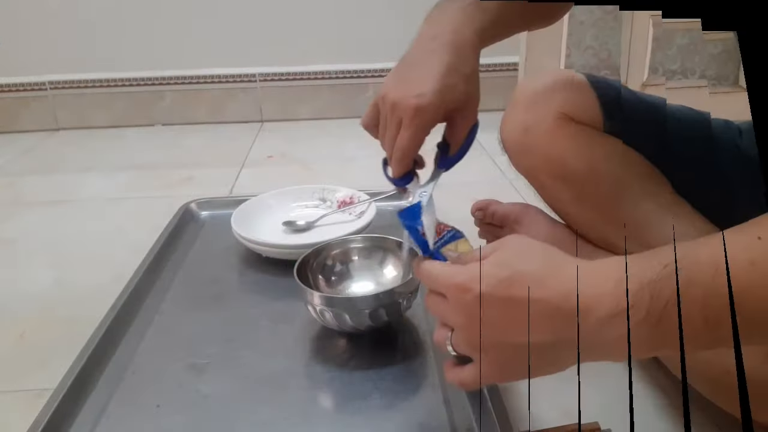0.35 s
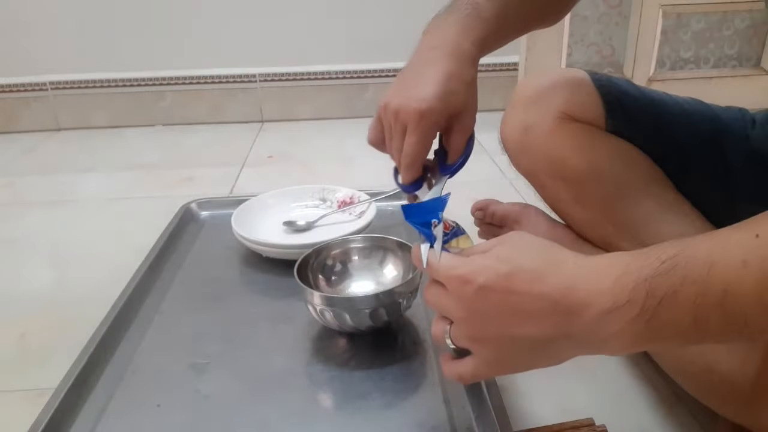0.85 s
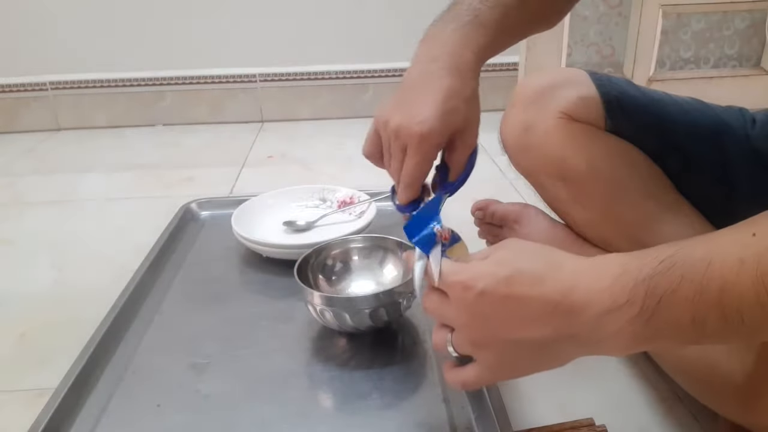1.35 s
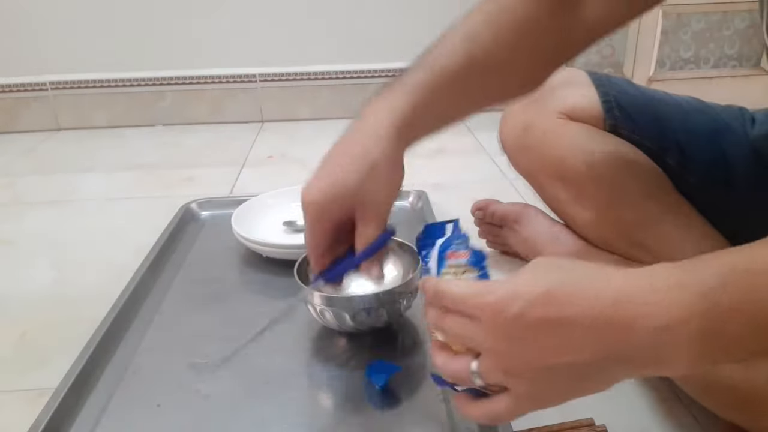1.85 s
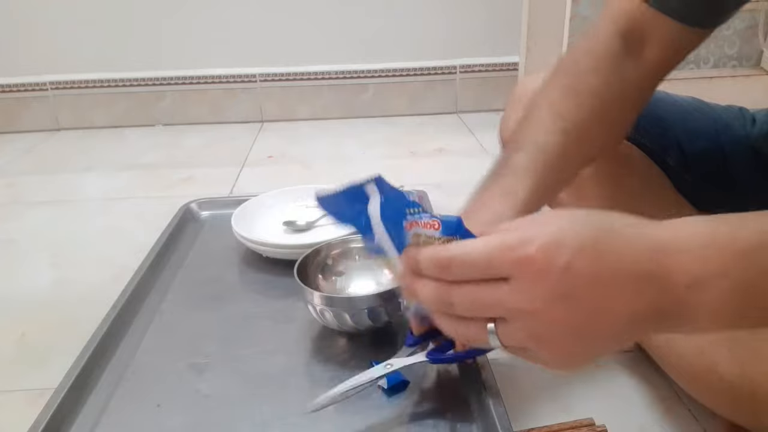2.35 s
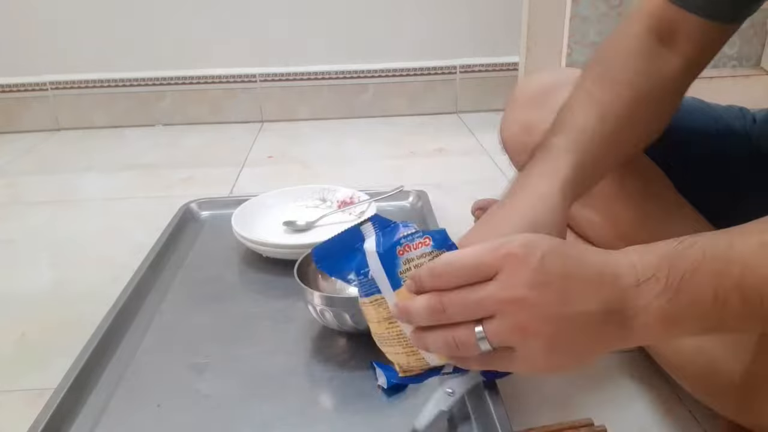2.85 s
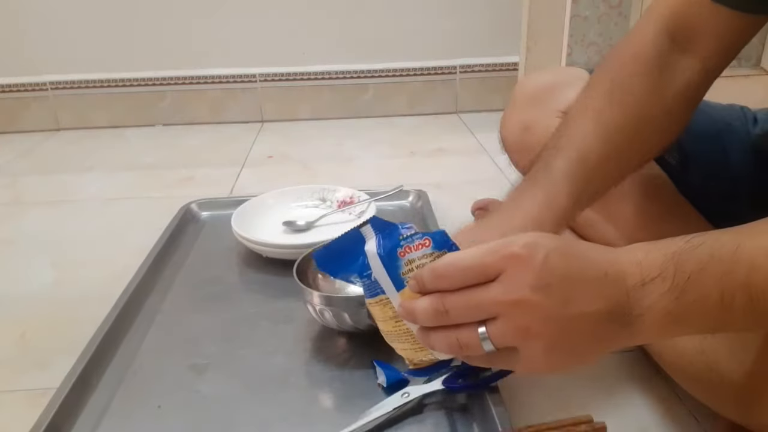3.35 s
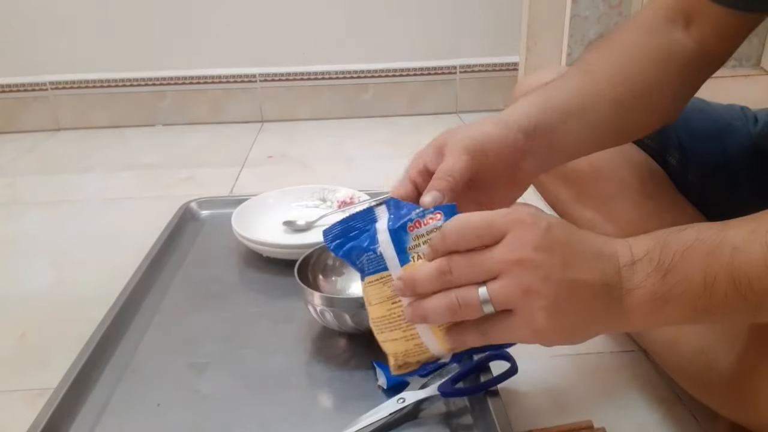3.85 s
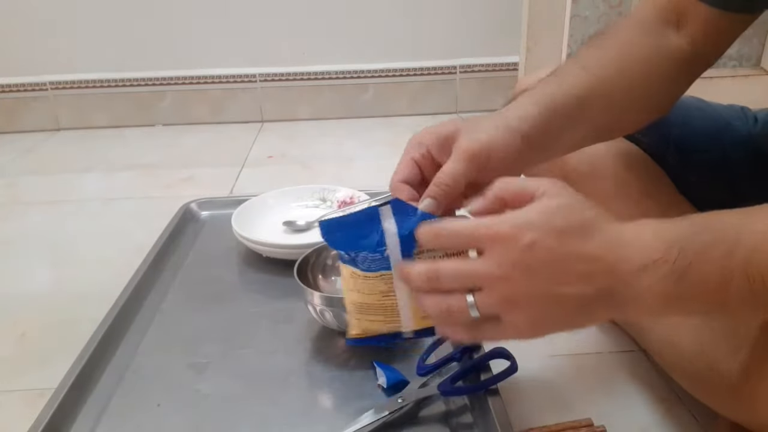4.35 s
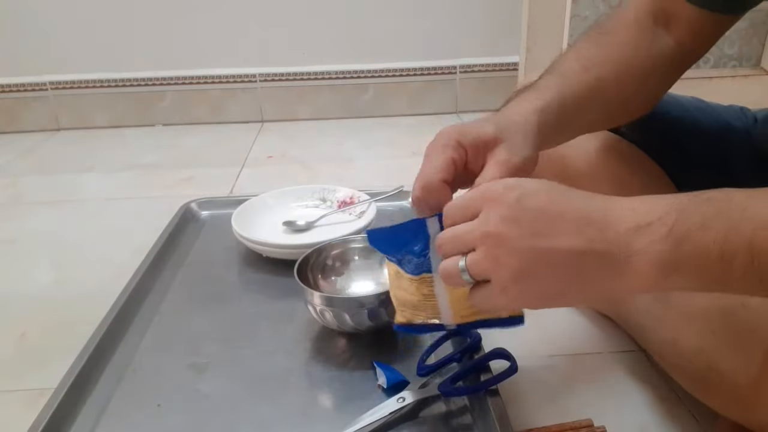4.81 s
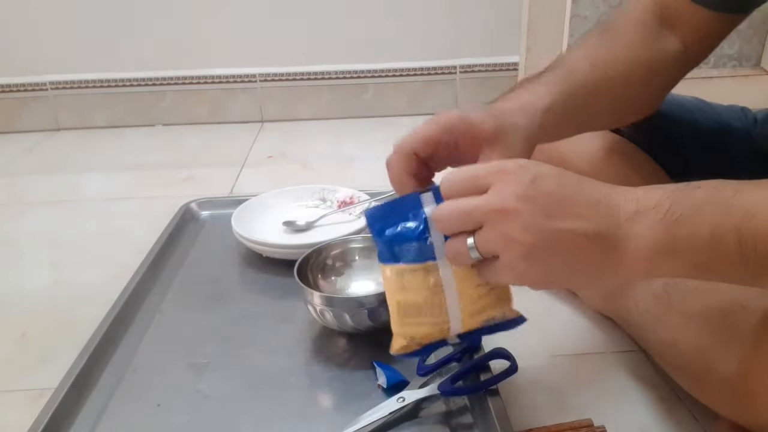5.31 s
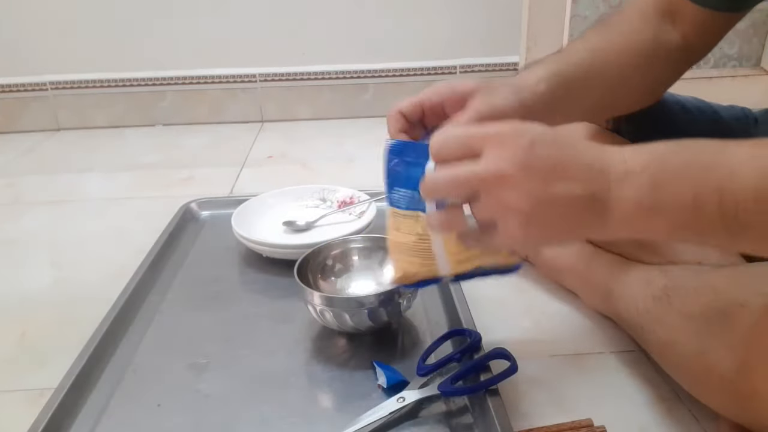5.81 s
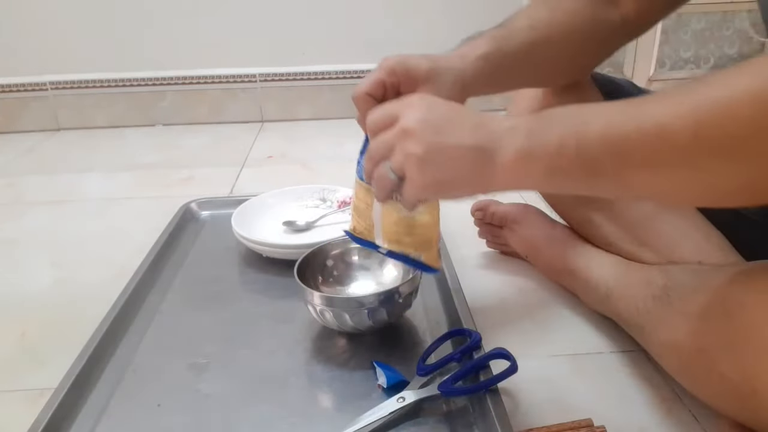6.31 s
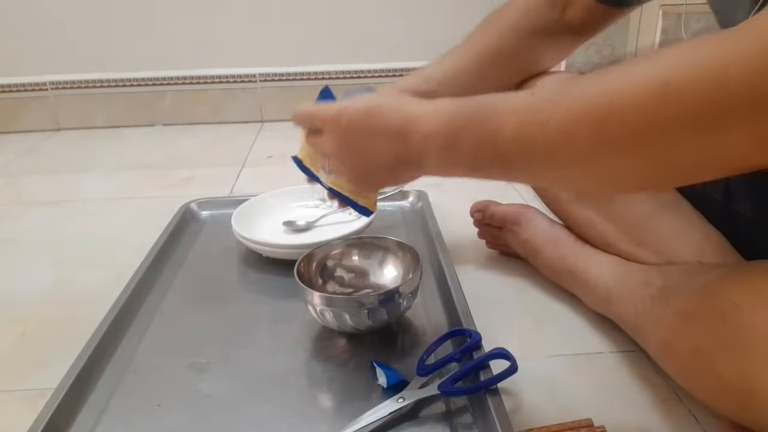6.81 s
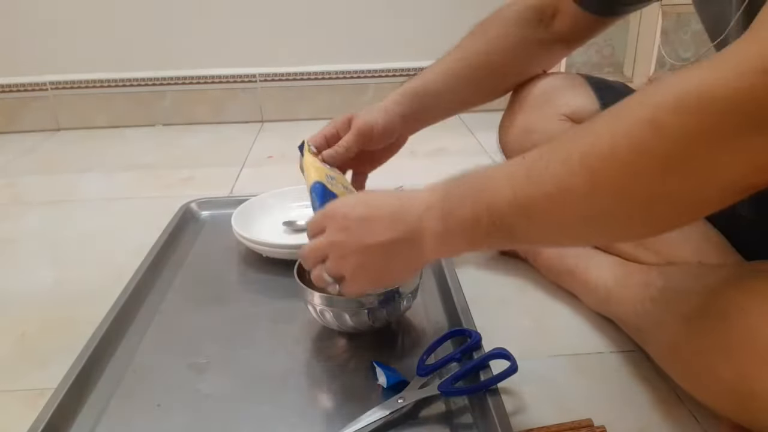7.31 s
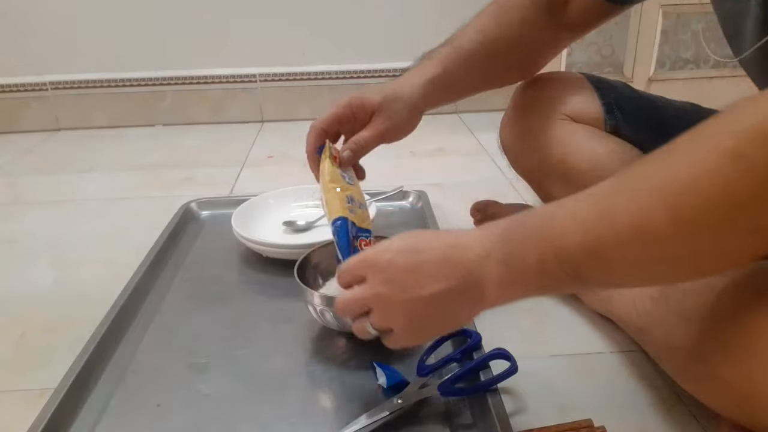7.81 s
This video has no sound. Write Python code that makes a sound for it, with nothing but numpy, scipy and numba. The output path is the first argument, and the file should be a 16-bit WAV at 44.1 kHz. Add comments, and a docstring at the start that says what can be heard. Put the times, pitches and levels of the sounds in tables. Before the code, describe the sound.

Stiff plastic film snaps and rustles under busy fingers, first during cutting, then sparsely. Scissors are put down on a metal tray with a few resonant clanks. The packet is turned and squeezed, crackling hardest a little past the middle, then settles before dry grains spill into a small steel bowl, ticking and ringing it before the heap muffles them. Close, bright small-microphone sound with short hard-room reverberation and faint low machine hum.

```python
"""Food packet, scissors and poured grains

A plastic packet crackles as it is cut open and handled close to a small microphone in a tiled room.
Creases snap as sprays of short damped tones. Scissors laid on a steel tray are noise through its resonances.
Fine dry grains then pour into a steel bowl as showers of ticks, ring it, and muffle it as they heap up.
Behind them a far machine hums in sine tones under a low rumble of filtered noise."""
import sys
import numpy as np
from scipy import signal
from scipy.fft import rfft, irfft, next_fast_len
from scipy.io import wavfile
from scipy.ndimage import map_coordinates
from numba import njit

SR = 44100
rng = np.random.default_rng(int(sys.argv[2]) if len(sys.argv) > 2 else 0)


def field_ratio(decibels):
    """Amplitude ratio for a level in dB (20 dB per decade); scalars and array-likes work."""
    return 10 ** (np.asarray(decibels, dtype=float) / 20)


def wav_record(signal):
    """Record a signal, one row per channel, as 16-bit PCM in the file named by sys.argv[1]."""
    frames = np.transpose(np.atleast_2d(signal))
    bounded = np.clip(frames, -1, 1)
    # unit amplitude maps onto the largest positive 16-bit level
    quanta = np.round(bounded * 32767).astype(np.int16)
    wavfile.write(sys.argv[1], SR, quanta)


N = 360451

# Background of the place. Each row: time in seconds, rumble level in dB, room air level in dB.
BACKGROUND_LEVELS = [(0, -64, -58.5), (.45, -66, -58.5), (.8, -55.5, -57), (2.4, -54, -57.5),
                     (2.85, -50, -57), (3.3, -52, -54.5), (4.2, -54, -57.5), (5.4, -54.5, -58),
                     (5.7, -45.5, -63), (6.4, -50, -60), (7.1, -45.5, -48), (7.8, -48, -60),
                     (8.17, -51.5, -65.5)]
# Tones of the far machine. Each row: frequency in Hz, nominal level in dB.
MACHINE_HUM = [(167, -64.5), (319, -60), (500, -63.5), (701, -60.5), (803, -64), (947, -66)]
# Spectrum of the rumble. Each row: frequency in Hz, relative density in dB per Hz.
RUMBLE_SPECTRUM = [(20, -34), (35, -2), (50, -6), (57, 8), (66, -4), (85, -1.5), (105, -6.5), (116, 0.5),
                   (130, -15), (170, -12), (250, -47)]
# Spectrum of the room air. Each row: frequency in Hz, relative density in dB per Hz.
AIR_SPECTRUM = [(100, -48), (200, 10), (400, 1), (800, 12.5), (1330, -11), (2300, -10.5), (4000, -25),
                (9500, -51), (15000, -102)]
# Dull bumps through the floor. Each row: start in seconds, level in dB before softening, pitch in Hz.
FLOOR_BUMPS = [(2.861, -30, 62), (3.601, -32.5, 113), (5.751, -30, 108), (8.111, -27.5, 133)]
# Decay of the tiled room. Each row: frequency in Hz, t60 in seconds.
ROOM_DECAY = [(200, 0.24), (1500, 0.52), (6000, 0.59), (14000, 0.33)]
# Response of the small microphone. Each row: frequency in Hz, gain in dB.
MIC_RESPONSE = [(22, -30), (45, 2.5), (1200, -1), (2100, 6), (2700, -3.5), (3200, -6.5), (4300, -4),
                (6500, 0.5), (11000, 3.5), (15400, -1.5), (15900, -35)]
# Scissors touching the tray. Each row: start in seconds, nominal level in dB, steel clatter in dB relative
# to the knock before resonance, t60 of the knock in seconds, contact time in ms.
SCISSOR_CONTACTS = [(2.653, -21, -27, 0.37, 0.16), (2.662, -27.5, -25, 0.39, 0.15),
                    (2.861, -44, -6, 0.086, 0.026), (2.69, -32, -25, .25, .13), (2.8, -43, -25, .3, .12),
                    (2.877, -41, -28, 0.2, .06), (2.905, -41, -25, .2, .06),
                    (3.083, -43.5, -13, 0.033, 0.13), (3.144, -30.5, -27, 0.27, 0.19),
                    (3.149, -21.5, -46, 1, 0.34), (3.2, -23, -12, 0.29, 0.044),
                    (3.21, -24, -16, 0.46, 0.029), (3.2115, -17, -15, .02, .04), (3.252, -30, -15, .3, .04)]
# Resonances of the steel tray. Each row: frequency in Hz, width in Hz, gain in dB.
TRAY_MODES = [(395, 133, -11.5), (740, 105, -4.5), (934, 132, -1.5), (1215, 120, 4.5), (1620, 580, -1.5),
              (2010, 440, -2), (2630, 730, -5)]
# Lumps striking the bowl wall. Each row: start in seconds, level in dB, pitch in Hz that rings most.
BOWL_LUMPS = [(7.462, -40, 11340), (7.474, -31, 8900), (7.51, -25.5, 5272), (7.513, -27, 7322),
              (7.558, -34, 8245), (7.582, -36, 7800)]
# Modes of the steel bowl. Each row: frequency in Hz, relative level in dB, nominal t60 in seconds.
BOWL_MODES = [(5272, 0, .3), (6630, -12, .06), (7322, -1, .07), (7763, -5, .06), (8245, -2, .09),
              (8740, -3, .06), (9528, -8, .05), (9964, -8, .05), (10470, -9, .05), (10900, -8, .05),
              (11340, -6, .07), (12640, -10, .05)]
# Single late grains dropping on the heap. Each row: start in seconds, nominal level in dB, middle pitch in Hz.
LATE_GRAINS = [(7.6994, -38, 11000), (7.7987, -41, 11700), (7.9563, -44, 11100), (8.0244, -47, 11100),
               (8.082, -44, 11100), (8.1194, -46, 10300)]
# Creases flipping at set times, strong and faint. Each row: start in seconds, nominal snap level in dB,
# nominal flap level in dB.
SET_CREASES = [(0.0299, -37.5, -31.5), (0.0909, -45, -51), (0.1122, -40, -30), (0.1587, -31.5, -42),
               (0.172, -40, -26.5), (0.2454, -37.5, -31), (0.2545, -33.5, -45), (0.3065, -45, -53),
               (0.3646, -43, -55), (0.4384, -39, -42), (0.5092, -47, -40), (0.528, -41, -30.5),
               (0.6008, -36.5, -37), (0.6294, -32.5, -45), (0.638, -32, -31), (0.6557, -52, -29),
               (0.6794, -40, -43), (0.692, -33.5, -38), (0.7625, -51, -29), (0.7818, -27, -34),
               (0.831, -34.5, -27), (0.9043, -44, -35), (0.925, -35.5, -32), (0.9865, -28.5, -26),
               (1.0313, -33, -26), (1.0365, -29, -54), (1.0605, -34, -53), (1.0701, -38, -21),
               (1.124, -30.5, -39), (1.1346, -28, -43), (1.1622, -37, -20), (1.173, -29.5, -39),
               (1.2136, -30.5, -34), (1.226, -34, -24.5), (1.2462, -32, -54), (1.2718, -32, -45),
               (1.3309, -35.5, -34), (1.373, -23.5, -49), (1.4384, -35, -27), (1.4441, -36, -44),
               (1.4687, -25.5, -28), (1.556, -34, -40), (1.5716, -37, -35), (1.6459, -42, -48),
               (1.6901, -40, -48), (1.7347, -38, -57), (1.754, -38.5, -37), (1.7662, -35, -40),
               (1.7988, -33, -32), (1.8195, -41, -42), (1.8462, -43, -43), (1.904, -49, -57),
               (2.1234, -41.5, -56), (2.2515, -42, -38), (2.2572, -42, -30), (2.39, -47, -60),
               (2.4057, -35.5, -34), (3.5606, -46, -32.5), (3.6284, -40.5, -41), (3.8124, -45.5, -50),
               (3.8496, -45, -46), (3.8774, -42, -37), (3.9587, -28.5, -41), (4.132, -42, -37),
               (4.1475, -39, -49), (4.3354, -45, -58), (4.4008, -43, -44), (4.4781, -34, -38),
               (4.4886, -32.5, -31), (4.5807, -48, -41), (4.6011, -29, -31.5), (4.7841, -26.5, -48),
               (4.7948, -30.5, -35), (4.86, -35.5, -41), (4.9055, -30.5, -33), (4.9782, -26, -15),
               (5.0262, -29.5, -29), (5.0427, -25, -26), (5.0778, -27, -23), (5.102, -29, -19.5),
               (5.153, -42, -52), (5.2048, -29, -26.5), (5.2207, -32, -28), (5.2484, -35, -43),
               (5.2927, -35, -23.5), (5.4263, -33, -26), (5.4652, -35, -28), (5.493, -30, -28),
               (5.5168, -30, -35), (5.5272, -29, -27), (5.5476, -29, -14), (5.5755, -22, -26),
               (5.8206, -41, -41), (5.8305, -33.5, -47), (5.855, -31, -28), (5.8921, -35.5, -21.5),
               (5.9562, -33.5, -34), (6.006, -45, -36), (6.0454, -31, -28), (6.0953, -30, -28.5),
               (6.109, -35, -25), (6.1558, -34, -20), (6.2163, -30, -28), (6.273, -32, -48),
               (6.2974, -25.5, -23), (6.3187, -31, -38), (6.3829, -39, -27), (6.4107, -35, -29.5),
               (6.4824, -42, -38), (6.5437, -27.5, -47), (6.5489, -23.5, -24), (6.5884, -30, -37),
               (6.6791, -40, -65.5), (6.7307, -40.5, -29.5), (6.8186, -63, -31), (6.8387, -46, -38),
               (6.887, -61, -33), (6.9145, -48, -40), (6.9254, -39, -45), (7.0445, -43, -35),
               (7.0624, -32.5, -28), (7.0998, -35.5, -23.5), (7.1166, -38, -27.5), (7.1477, -35, -38),
               (7.159, -38, -32), (7.1838, -26, -26), (7.2723, -45, -33), (7.2773, -35, -26),
               (7.3672, -31.5, -24.5), (7.4515, -39, -30), (7.7444, -38, -41)]
# Moves of the fingers, each a swell of rustle. Each row: peak time in seconds, length in seconds,
# fine crackle level in dB, level of the loose film's flapping in dB.
FINGER_MOVES = [(0.047, 0.11, -56, -56), (0.192, 0.19, -63, -48), (0.37, .12, -60.5, -52),
                (0.633, .2, -56, -52.5), (0.8, 0.11, -52.5, -53), (1.06, 0.36, -57, -47.5),
                (1.23, 0.21, -58, -55), (1.54, 0.63, -60.5, -52), (1.807, 0.2, -57, -51),
                (2.22, 0.33, -71, -63), (2.4, .18, -66, -66), (3.63, 0.12, -62, -57.5),
                (3.933, 0.24, -60.5, -50.5), (4.207, 0.2, -63, -54), (4.49, 0.2, -60, -52),
                (4.602, 0.2, -51, -47.5), (4.813, .14, -58, -52), (4.982, 0.15, -50.5, -44),
                (5.057, 0.19, -46, -41), (5.226, 0.27, -52, -44.5), (5.548, 0.14, -37.5, -31),
                (5.877, 0.16, -52, -42.5), (5.993, 0.28, -58.5, -47.5), (6.117, 0.34, -49, -41.5),
                (6.305, 0.25, -57.5, -44.5), (6.562, 0.15, -53, -42.5), (6.885, 0.39, -74, -56),
                (7.085, 0.17, -59, -53), (7.373, 0.24, -53.5, -44), (7.538, 0.25, -47, -42),
                (7.92, .45, -68, -50), (8.08, 0.084, -64, -59.5)]

POUR_S = 7.46  # start of the stream of grains


def unit(x):
    """Scaled to rms 1."""
    return x / np.sqrt(np.mean(x ** 2) + 1e-20)


def along(points, hz):
    """Values of (Hz, value) points, read on a log frequency axis."""
    f, value = np.transpose(points)
    return np.interp(np.log(hz + 1), np.log(f + 1), value)


def curves(rows):
    """One value per sample for each column after the time."""
    s, *columns = np.transpose(rows)
    return [np.interp(np.arange(N) / SR, s, column) for column in columns]


def wobble(rate):
    """A smooth random curve, rate knots a second."""
    coarse = np.arange(0, N + 32, 32)
    knots = rng.standard_normal(int(N * rate / SR) + 4)
    return np.interp(np.arange(N), coarse, map_coordinates(knots, [coarse * rate / SR]))


def filtered(x, response):
    """x times a complex response of frequency."""
    m = next_fast_len(N + 8192)
    return irfft(rfft(x, m) * response(np.fft.rfftfreq(m, 1 / SR)), m)[:N]


def resonances(table):
    """Causal response of (Hz, width in Hz, dB) peaks, alternating in sign."""
    def response(f):
        return sum((-1) ** k * field_ratio(db) * 1j * f * width / (hz * hz - f * f + 1j * f * width)
                   for k, (hz, width, db) in enumerate(table))
    return response


@njit
def damped(at, step, fade, gain, size, total):
    """Sums one decaying rotation per row, each size samples long."""
    out = np.zeros(total + size)
    for k in range(len(at)):
        z, turn = gain[k] + 0j, np.exp(1j * step[k] - fade[k])
        for i in range(size):
            out[at[k] + i] += z.imag
            z *= turn
    return out[:total]


def grains(s, hz, cycles, gain, size):
    """Damped sines, each fading 60 dB in so many cycles, summed at their times."""
    at = np.round(s * SR).astype(np.int64).clip(0, N)
    return damped(at, 2 * np.pi * hz / SR, np.log(1000) * hz / (SR * cycles), gain, size, N)


def shower(count, mid_hz, spread, cycles, scatter_db, size, t0=0, t1=N / SR, pitches=1):
    """Random ticks of rms 1 from t0 to t1, a few much larger than the rest, each on one or more pitches."""
    ticks = [rng.uniform(t0, t1, count), rng.exponential(1, count)]
    when, big = np.repeat(ticks, pitches, axis=1)
    pitch, late = rng.standard_normal((2, len(when)))
    hz = (mid_hz * np.exp(spread * pitch)).clip(200, 16000)
    x = grains(when + 0.0008 * late, hz, cycles, field_ratio(scatter_db * big.clip(0, 3)), size)
    return unit(x) * np.sqrt((t1 - t0) * SR / N)


def shaped_noise(spectrum):
    """Random noise of rms 1 with the given spectrum."""
    return unit(filtered(rng.standard_normal(N), lambda hz: field_ratio(along(spectrum, hz))))


def machine_hum():
    """Slightly unsteady sine tones of the far machine, swelling in at the start."""
    t = np.arange(N) / SR
    hum = 0
    for hz, db in MACHINE_HUM:
        level = np.sqrt(2) * field_ratio(db - 1.5 + 1.85 * wobble(14))
        hum = hum + level * np.sin(2 * np.pi * hz * t + 1.2 * wobble(7))
    return np.clip(t / 1.3, 0, 1) * hum


def background():
    """Lumpy rumble and room air as shaped noise, with the hum."""
    rumble_db, air_db = curves(BACKGROUND_LEVELS)
    rumble = field_ratio(rumble_db + 0.84 * wobble(9.7)) * shaped_noise(RUMBLE_SPECTRUM)
    return rumble + field_ratio(air_db) * shaped_noise(AIR_SPECTRUM) + machine_hum()


def bumps():
    """Soft low pushes, a few damped cycles each."""
    s, db, hz = np.transpose(FLOOR_BUMPS)
    pushes = grains(s, hz, 5.7, field_ratio(db), size=9000)
    return filtered(pushes, lambda f: 1 / (1 + 1j * f / 250) ** 2)


def tiled_room(x):
    """Each frequency dies at its own speed; the tail is a fresh random draw of decaying noise every half second."""
    wet, step = np.zeros(N + 2 * SR), SR // 2
    for at in range(0, N, step):
        hz, t, z = signal.stft(rng.standard_normal(SR * 3 // 4), SR, nperseg=256)
        decay = field_ratio(-60 * t / along(ROOM_DECAY, hz)[:, None])
        tail = signal.istft(z * decay, SR, nperseg=256)[1]
        answer = signal.fftconvolve(x[at:at + step], tail / np.linalg.norm(tail))
        wet[at + 100:][:len(answer)] += answer  # the walls answer 100 samples late
    return wet[:N]


def scissors():
    """Each contact shakes the dense modes of the sheet; the steel clatter dies faster."""
    knock, clatter, t = np.zeros(N), np.zeros(N), np.arange(SR // 2) / SR
    for s, db, clatter_db, t60, contact_ms in SCISSOR_CONTACTS:
        at, pole = round(s * SR), np.exp(-1000 / (SR * contact_ms))
        # a longer contact misses the high modes
        force = signal.lfilter([(1 - pole) ** 2], [1, -2 * pole, pole ** 2], rng.standard_normal(len(t)))
        onset = 1 - np.exp(-t / 0.0027) + 1.6 * field_ratio(-60 * t / 0.032)
        knock[at:at + len(t)] += field_ratio(db - 60 * t / t60) * onset * force
        clatter_level = field_ratio(db + clatter_db - 60 * t / (0.48 * t60))
        clatter[at:at + len(t)] += clatter_level * rng.standard_normal(len(t))
    body = filtered(knock, resonances(TRAY_MODES))
    return field_ratio(15) * body + field_ratio(16.5) * filtered(clatter, resonances([(3800, 3240, 0)]))


def grain_ticks():
    """Grains tick on the steel and on each other: a first rush, then a thin trickle."""
    rise_s, hold_s, rush_db, fade_db_per_s = 0.012, 0.11, -34.5, 150
    trickle_db, trickle_end_s = -61, 8.15
    t = np.arange(N) / SR
    since = t - POUR_S
    rush_level = field_ratio(rush_db - fade_db_per_s * (since - rise_s - hold_s).clip(0))
    rush = rush_level * (since / rise_s).clip(0, 1)
    trickle = field_ratio(trickle_db + 3.0 * wobble(18)) * (t > POUR_S) * (t < trickle_end_s)
    stream = (rush + trickle) * field_ratio(1.7 * wobble(70))
    ticks = stream * shower(count=2600, mid_hz=11500, spread=0.24, cycles=22, scatter_db=3, size=200, t0=POUR_S)
    return filtered(ticks, lambda f: (1j * f / (7000 + 1j * f)) ** 3)  # tiny grains have no low tones


def bowl_ringing(ticks):
    """The ticks excite the bowl's modes, ever less as the heap of grains damps the wall."""
    since = np.arange(N) / SR - POUR_S
    bare = field_ratio(-40 * since.clip(0))
    return filtered(ticks * bare, resonances([(hz, 1.6 / t60, db) for hz, db, t60 in BOWL_MODES]))


def lump_strikes():
    """Lumps crack on the wall and ring the modes near their own pitch."""
    strike_t60_s, after_ring_db = 0.05, -10  # a struck mode drops fast at first, then a thin ring stays
    rings, cracks, t = np.zeros(N), np.zeros(N), np.arange(SR // 3) / SR
    for s, db, pitch_hz in BOWL_LUMPS:
        ring = 0
        for hz, level, t60 in BOWL_MODES:
            strength = field_ratio(level - 200 * abs(np.log(hz / pitch_hz)) ** 1.26)
            decay = field_ratio(-60 * t / strike_t60_s) + field_ratio(after_ring_db - 60 * t / (1.3 * t60))
            # each mode is a close, beating pair
            pair = np.sin(2 * np.pi * hz * t) + 0.4 * np.sin(2 * np.pi * 1.003 * hz * t)
            ring = ring + strength * decay * pair
        crack = 0.9 * field_ratio(-60 * t / 0.012) * rng.standard_normal(len(t))
        at = round(s * SR)
        rings[at:][:len(t)] += field_ratio(db) * ring
        cracks[at:][:len(t)] += field_ratio(db) * crack
    return rings + filtered(cracks, resonances([(750, 450, 2), (6500, 4000, 0)]))


def stragglers():
    """Each late grain bounces for a few ms on a spray of high pitches."""
    s, db, hz = np.repeat(LATE_GRAINS, 12, axis=0).T
    pitch, late = rng.standard_normal((len(s), 2)).T
    spray_hz = (hz * np.exp(0.1 * pitch)).clip(200, 16000)
    return grains(s + 0.003 * np.abs(late), spray_hz, 25, field_ratio(db - 5), size=200)


def sliding():
    """Very many grains slide down inside the tilted packet: a soft even hiss from the first rush onward."""
    hiss = shower(count=9000, mid_hz=7000, spread=0.25, cycles=8, scatter_db=1, size=100, t0=POUR_S)
    return field_ratio(-62 + 1.5 * wobble(12)) * hiss


def pouring():
    """Ticking grains, the bowl they ring, lumps, late grains and the slide inside the packet."""
    ticks = grain_ticks()
    bowl = field_ratio(3.5) * ticks + field_ratio(18) * bowl_ringing(ticks) + lump_strikes()
    return bowl + stragglers() + sliding()


def fingers():
    """Level in dB of crackle and flapping: every move swells and dies away, over the still packet."""
    rise_db, fall_db = 24.5, 25  # crackle lost one length before and after the peak
    flap_swing = 0.88  # the flapping swings less
    still_crackle_db, still_flap_db = -76, -60.5  # the packet merely held
    s, length, crackle_db, flap_db = np.transpose(FINGER_MOVES)[:, :, None]
    t = np.arange(0, N + 64, 64) / SR
    apart = (t - s) / length
    lost_db = np.where(apart < 0, -rise_db * apart, fall_db * apart)

    def total(db, still_db):
        power = np.sum(field_ratio(db) ** 2, axis=0) + field_ratio(still_db) ** 2
        return np.interp(np.arange(N) / SR, t, 10 * np.log10(power))

    return total(crackle_db - lost_db, still_crackle_db), total(flap_db - flap_swing * lost_db, still_flap_db)


def chance_creases(crackle_db, flap_db, count=150):
    """Rows as in SET_CREASES for further creases at random times, as frequent and strong as the fingers are busy."""
    snap_over_db, flap_over_db = 12, 5  # over the crackle and flapping of the moment
    eagerness = 0.4  # how much they crowd into busy moments
    when, big, broad = rng.uniform(size=(count, 3)).T
    odds = np.cumsum(field_ratio(eagerness * crackle_db))
    at = np.searchsorted(odds, when * odds[-1]).clip(0, N - 1)
    snap_db = crackle_db[at] + snap_over_db - 3 * np.log(1 - 0.9 * big)
    panel_db = flap_db[at] + flap_over_db - 3 * np.log(1 - 0.9 * broad)
    return np.transpose([at / SR, snap_db, panel_db])


def snaps(creases):
    """A crease flips within a few ms: a wide spray of short high modes, and a lower flap of its panel."""
    modes = 32
    s, db, flap_db = np.repeat(creases, modes, axis=0).T
    own_size = np.repeat(rng.standard_normal(len(creases)), modes)
    crease_hz = 8200 * np.exp(0.058 * own_size)  # each crease has its own size
    snap_pitch, uneven, flap_pitch, flap_uneven, shift = rng.standard_normal((len(s), 5)).T
    late = rng.exponential(1, len(s))
    lead = 0.0004 * shift
    snap_hz = (crease_hz * np.exp(0.3 * snap_pitch)).clip(2500, 15500)
    snap_gain = field_ratio(db - 5.5 + 1.8 * uneven - 1.6 * late)  # later modes tend to be weaker
    snap = grains(s + lead + 0.00066 * late, snap_hz, 11, snap_gain, size=140)
    flap_hz = 1500 * np.exp(0.427 * flap_pitch)
    flap_gain = field_ratio(flap_db - 18.5 + 2.0 * flap_uneven)
    flap = grains(s + 2 * lead + 0.0011 * late, flap_hz, 21.3, flap_gain, size=500)
    return snap + flap


def rustle(crackle_db, flap_db):
    """Countless small creases come in clumps while the fingers move; air in the packet adds a low flutter."""
    clumps = 2.6 * wobble(60)
    crackle = shower(count=3000, mid_hz=8360, spread=0.5, cycles=7.8, scatter_db=2.5, size=130, pitches=5)
    flaps = shower(count=5000, mid_hz=1602, spread=0.509, cycles=12.2, scatter_db=1.5, size=600)
    flutter = shower(count=1500, mid_hz=411.4, spread=0.315, cycles=21, scatter_db=4.0, size=1000)
    loose_film = flaps + field_ratio(-5) * flutter
    return field_ratio(crackle_db + 1.2 * clumps) * crackle + field_ratio(flap_db + 0.93 * clumps) * loose_film


def handled_packet():
    """Creases at set and at random times snap over a rustle; the random ones and the rustle follow the fingers."""
    crackle_db, flap_db = fingers()
    creases = np.vstack([SET_CREASES, chance_creases(crackle_db, flap_db)])
    return snaps(creases) + rustle(crackle_db, flap_db)


def scene():
    """Near sources, their room, and the background."""
    packet, bowl, tray = handled_packet(), pouring(), scissors()
    walls = tiled_room(field_ratio(-9) * packet + field_ratio(-29) * bowl + field_ratio(-4) * tray)
    return (packet + bowl + tray + walls + bumps() + background())[None]


def low_pass(x):
    """Removes everything above the highest recorded frequency."""
    return signal.sosfilt(signal.butter(12, 16670, fs=SR, output="sos"), x)


def record(dry):
    """The small microphone has a dip around 3200 Hz, between its body and treble ranges."""
    mix = filtered(dry[0], lambda hz: field_ratio(along(MIC_RESPONSE, hz)))[None]
    return low_pass(mix)


dry = scene()
out = record(dry)
wav_record(out)
```